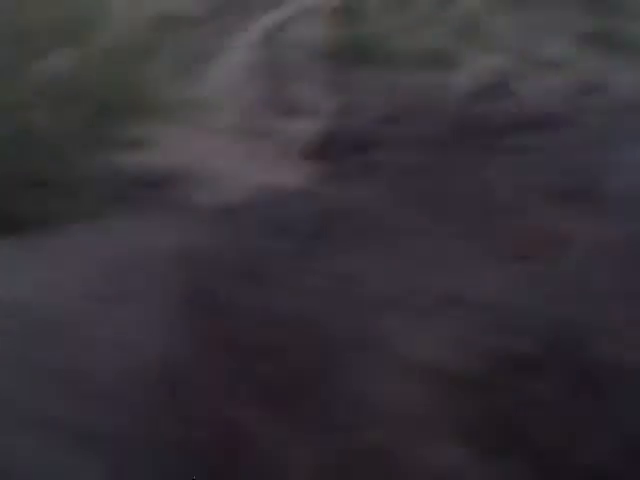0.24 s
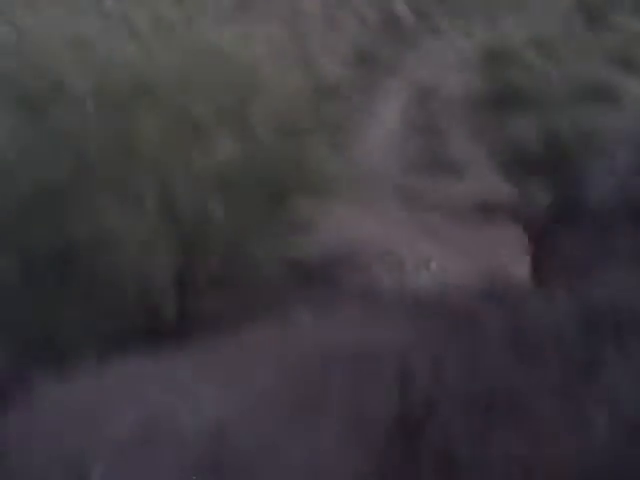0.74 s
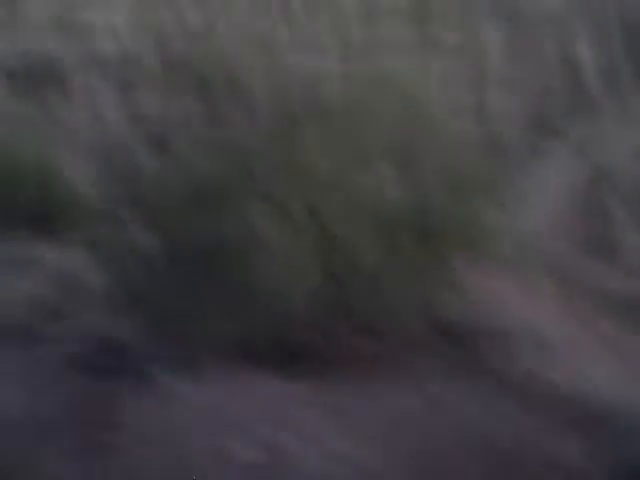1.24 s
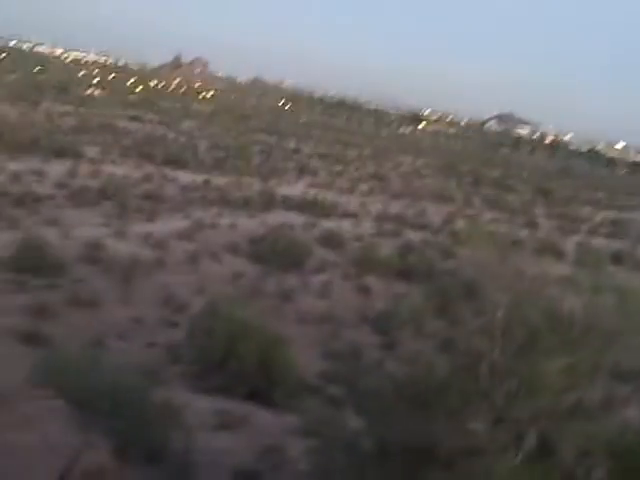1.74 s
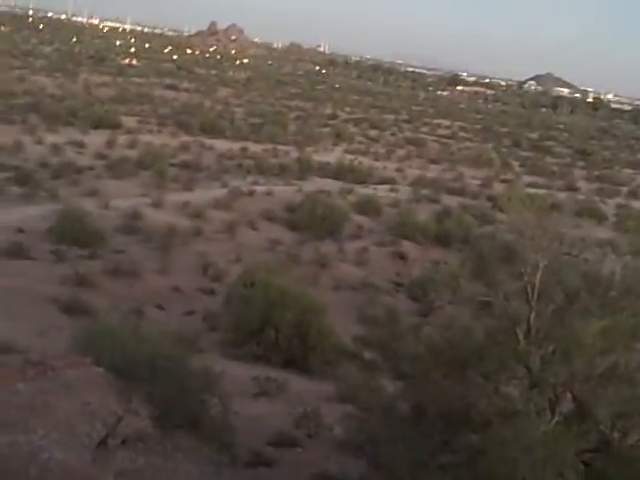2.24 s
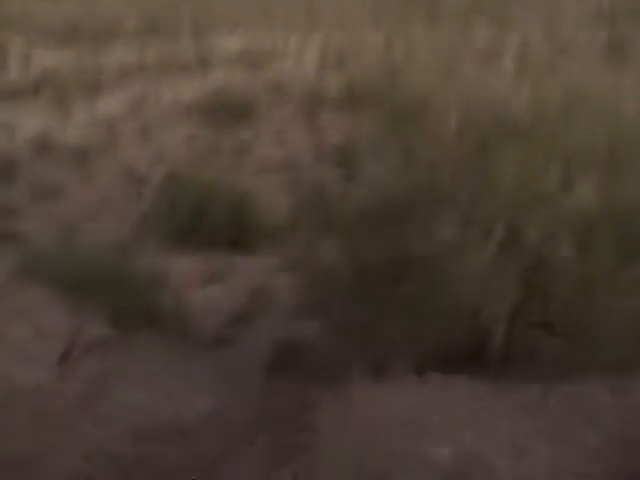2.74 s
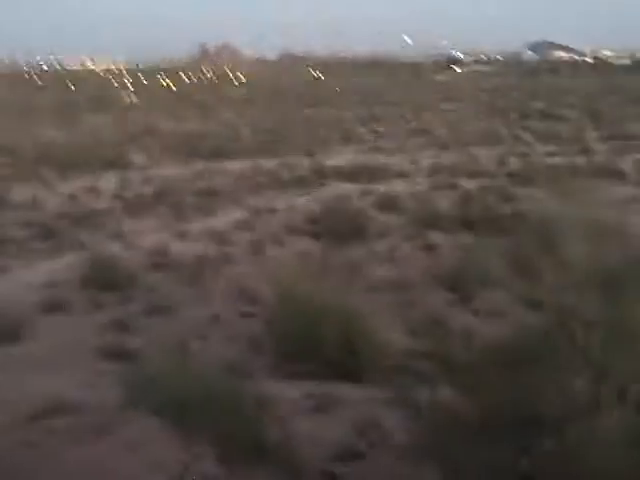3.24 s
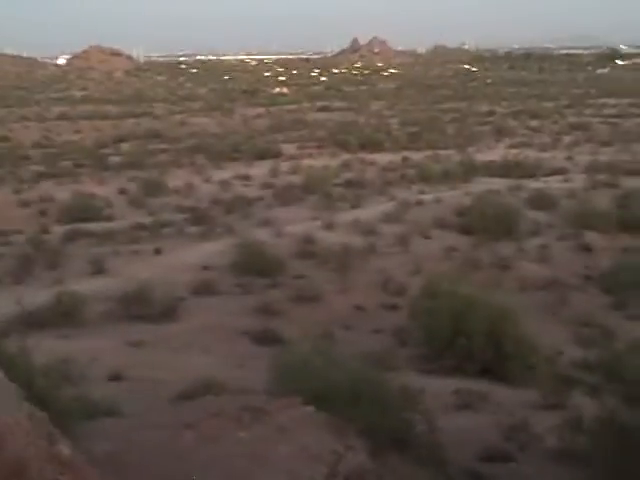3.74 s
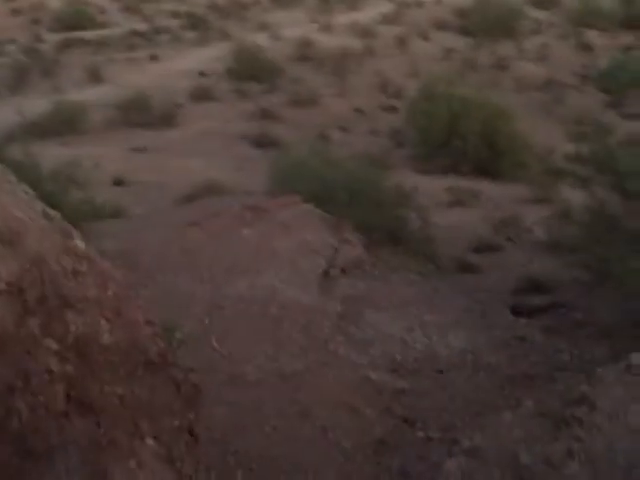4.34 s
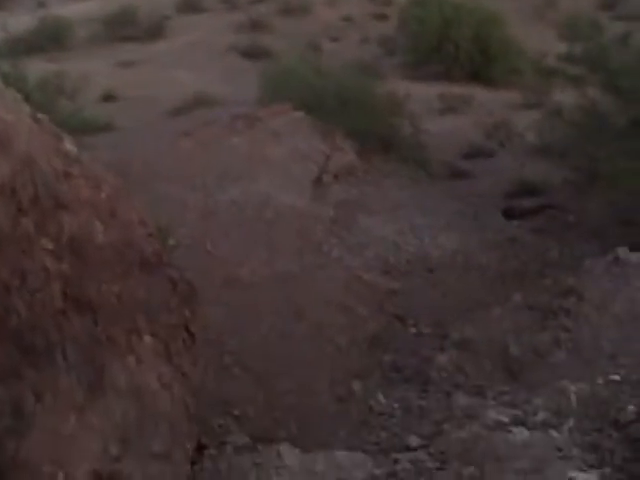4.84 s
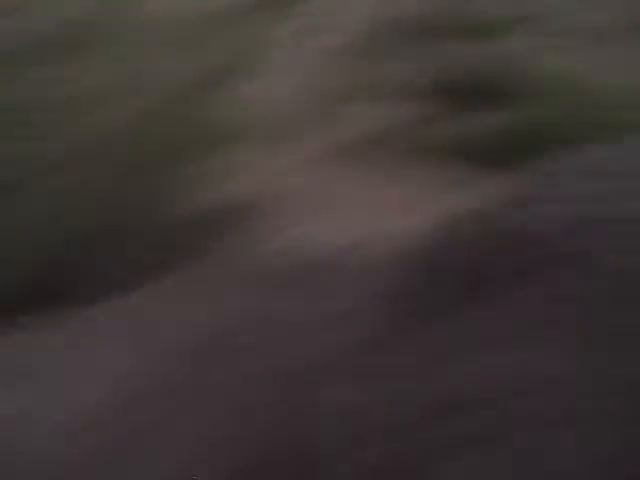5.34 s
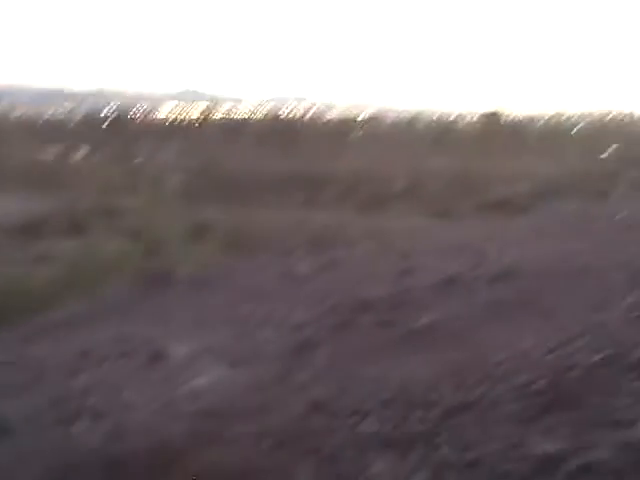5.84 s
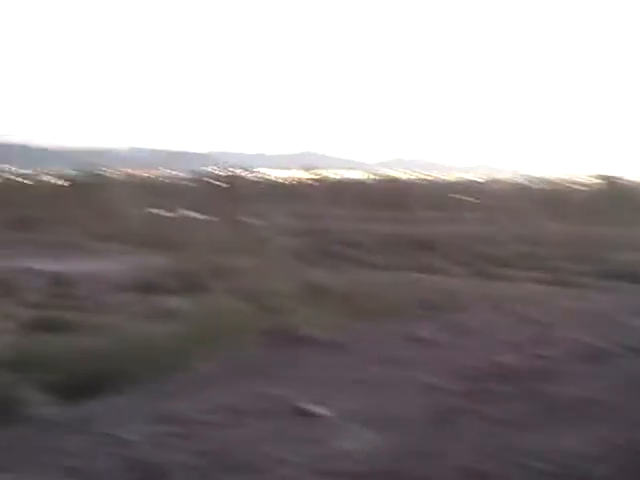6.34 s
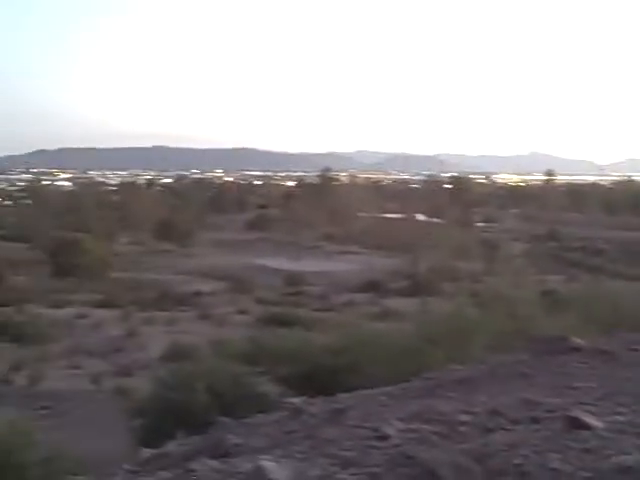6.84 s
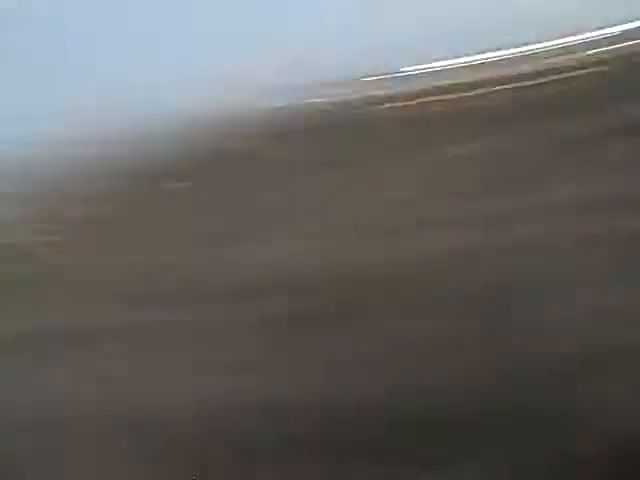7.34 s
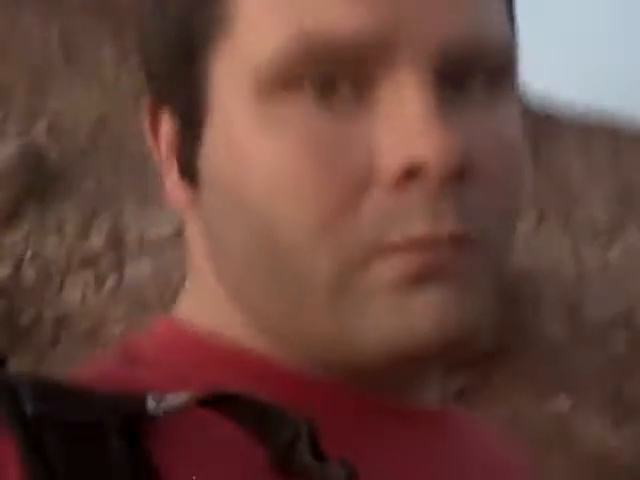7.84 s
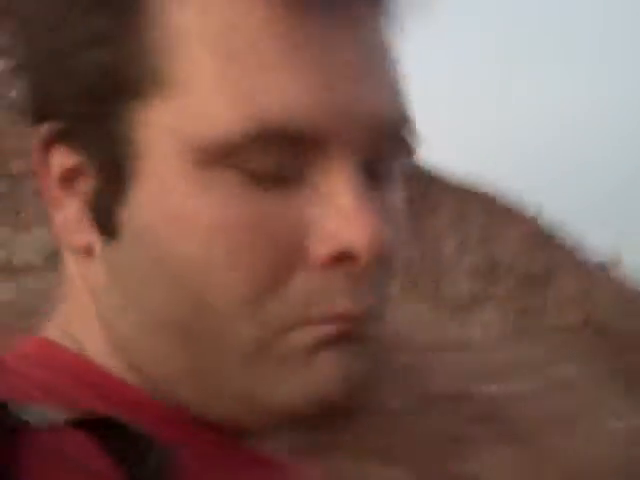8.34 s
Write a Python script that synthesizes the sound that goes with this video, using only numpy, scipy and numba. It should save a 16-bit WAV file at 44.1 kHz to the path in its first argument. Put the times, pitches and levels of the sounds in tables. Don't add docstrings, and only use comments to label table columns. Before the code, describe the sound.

Throughout about 8.6 seconds a nearby cicada buzzes without a break: a dry, piercing sizzle of rapid clicks, about 140 beats a second, brightest around 9 to 10 kHz. From 0 to 0.7 s gravel crunches in quick grains with dull stone knocks; a sharp stone clack comes near 1.05 s and small knocks continue to 1.5 s. Then the walker stands, and the buzz drifts gently in level and tone as the handheld microphone sways, with tight echoes from ground and rock. Faint taps touch the camera at 3.2 and 3.5 s, a clearer double knock at 5.3 s. Around 7.3 to 7.6 s handling taps and a slight shuffle accompany a turn; the buzz drops markedly, then returns partly, quieter and hollow with close echoes. At 8.4 s come small clicks and gravel, then a rapid strap creak at 8.5. Very faint distant traffic rumbles below; coarse digital fizz clings to the buzz.

```python
import sys
import numpy as np
from scipy import signal
from scipy.io import wavfile
from scipy.ndimage import uniform_filter1d, map_coordinates
from numba import njit

SR = 44100
rng = np.random.default_rng(int(sys.argv[2]) if len(sys.argv) > 2 else 0)


def attenuation_scalar(level_db):
    decades = np.asarray(level_db, float) / 20
    return 10 ** decades


def dump_mix(stems):
    frames = np.atleast_2d(stems).T
    limited = np.clip(frames, -1, 1)
    pcm = np.round(limited * 32767).astype(np.int16)
    wavfile.write(sys.argv[1], SR, pcm)


N = 378676

BEATS_PER_S = 142.2
RIB_DRIFT, RIB_DRIFT_DB = .013, 1.5
SOFTEN = 1.5
SCRUB_DB, SCRUB_SHADE_DB = -10.5, 7
ECHO_FADE_S = .08
HAND_MS = .03
TOWN_DB = -50
SNAP_T60 = .011

# (time [s], path from insect to microphone beyond a fixed base [m])
WALK = [(0, 2.81), (.125, 2.71), (.5, 2.2), (.875, 1.57), (1.25, 1.16), (1.5, .99), (2, .9), (2.5, .84),
        (2.875, .95), (3.2, .89), (3.5, .96), (3.875, .95), (4.35, 1.07), (4.85, .93), (5.375, .93),
        (6.08, 1.16), (6.65, .94), (8.59, .97)]
# (delay [ms], level [dB], pitch [Hz], pitch scatter [share], ring [ms], timing scatter [ms])
RIB_CLICKS = [(-.36, -12, 7299, .03, .09, .03), (-.2, -16.5, 13990, .03, .07, .1),
              (-.06, -1.79, 9797, .033, .135, .04), (.9, -22, 6588, .05, .16, .2),
              (1.35, -13, 11990, .015, .24, .07), (1.9, -12, 9496, .04, .1, .06),
              (2.2, -16, 12000, .015, .24, .08), (2.9, -15, 7283, .05, .11, .1),
              (3.1, -16, 10810, .05, .12, .2), (3.7, -18, 10470, .06, .1, .25),
              (4.3, -21, 6990, .07, .14, .25), (4.9, -18, 11800, .04, .14, .3),
              (5.6, -20, 10030, .06, .1, .3)]
# (frequency [Hz], level [dB per Hz])
AIR_SAC = [(5000, -50), (6000, -38), (6200, -19), (6350, -15), (6700, -17), (7400, -12.5), (8500, -7),
           (9400, -0.5), (10000, 0), (11250, -8), (12000, -5), (13000, -12), (15000, -20), (15700, -24)]
# (time [s], level [dB], off-axis blur of the peak [dB], aim toward the treble [dB])
CAMERA_AIM = [(0, -30, 0, 0.78), (.48, -32.5, 2, 1), (1.28, -29.5, 0.14, 0.11), (1.6, -31, -0.4, 0.35),
              (2.75, -30, -1.3, 0.24), (3.2, -30.5, -.5, -.5), (3.4, -32.5, 0.67, -.5),
              (4.05, -33, 2.5, -0.32), (4.6, -31, -0.84, -0.94), (5, -32.5, 1.4, -1.25),
              (5.3, -30, -0.97, -0.65), (5.6, -31, -0.14, 0.3), (5.85, -34, -0.23, -0.33),
              (6.4, -34, -1.03, 0.25), (7.42, -31, -0.82, 1.86), (7.68, -41, 1.76, -0.4),
              (8.16, -37.5, -1.25, -0.25), (8.59, -38.5, 0.2, -0.7)]
# (low edge [Hz], high edge [Hz])
BUZZ_BANDS = [
    (8500, 11000),
    (6000, 8500),
    (11000, 13000),
    (13000, 15700),
]
# (level against the peak [dB], share of blur [ratio], share of aim [ratio])
BESIDE_PEAK = [
    (-10, 1.05, -1.05),
    (-5.5, .95, .95),
    (-13.5, 1.05, 1.05),
]
# (start [s], end [s])
TURNED_BACK = (7.45, 7.66)
# (start [s], end [s], first delay [ms], last delay [ms], level [dB])
SINGLE_ECHOES = [(-.1, .95, .72, .76, -11), (1.05, 3.15, .8, .83, -11), (0, 1.5, 1.25, 1.3, -15),
                 (1.15, 2.1, 1.72, 1.68, -14), (1.2, 1.95, 3.35, 3.1, -15), (1.85, 2.9, 3.02, 3.0, -11),
                 (2.85, 3.4, 3.0, 3.5, -11), (3.4, 3.8, 2.6, 2.5, -12), (3.8, 5.15, 2.98, 2.76, -11),
                 (3.7, 5.2, 1.3, 1.25, -15), (3.9, 4.7, 1.95, 1.75, -14), (4.2, 5.2, 2.4, 2.2, -14),
                 (5.2, 6.2, .95, .88, -12), (5.6, 6.95, 1.6, 1.5, -13), (5.7, 7.55, 3.3, 3.5, -14),
                 (6.85, 7.55, 1.87, 1.84, -9), (7.3, 8.05, .95, .75, -9), (7.9, 8.65, .98, .92, -3),
                 (7.8, 8.2, 2.2, 2.1, -7), (8.35, 8.7, 1.95, 2.0, -5), (7.9, 8.6, 3.1, 3.2, -11),
                 (7.95, 8.3, 4, 3.9, -10)]
# (frequency [Hz], level [dB per Hz])
TOWN_COLOUR = [(12, -25), (22, -4.5), (50, 0.5), (65, -3.5), (100, -2.5), (200, -8), (310, -16), (420, -17),
               (600, -21), (1000, -27), (2000, -40)]
# (time [s], length [s], thud level [dB], grind level [dB], grit level [dB])
GRAVEL_STROKES = [(0.082, 0.043, -44, -44.5, -47), (0.121, 0.046, -48, -32.5, -41),
                  (0.175, 0.037, -50.5, -37, -44.5), (0.2, 0.018, -52, -44, -50.5),
                  (0.212, 0.026, -42.5, -37, -44.5), (0.234, .04, -54, -48, -55),
                  (0.291, .06, -56, -51, -58), (0.454, .03, -60, -48.5, -55.5),
                  (0.53, 0.037, -49, -52, -60), (.567, .022, -46, -43, -51),
                  (.595, 0.043, -52.5, -49, -57.5), (.641, .033, -50, -45, -47),
                  (0.672, 0.033, -58, -52, -58), (1.081, .1, -53.5, -49.5, -58),
                  (1.438, 0.039, -54, -51, -58), (7.4, 0.11, -54.5, -55, -62.5),
                  (7.667, 0.061, -60, -56.5, -66.5), (8.351, 0.067, -63, -60.5, -62.5),
                  (8.42, 0.047, -52, -52.5, -57.5), (8.524, 0.08, -56.5, -52, -63.5)]
# (time [s], peak level [dB], pitch [Hz], time to fall 60 dB [s])
STONE_KNOCKS = [(.127, -25, 905, .012), (.143, -24, 1900, 0.012), (.188, -27, 1249, .016),
                (0.22, -25, 800, .012), (.229, -29, 1400, .012), (0.356, -28, 899.5, .008),
                (.412, -39, 829.8, .012), (.534, -37.5, 419, .015), (.573, -29, 709.2, .014),
                (.646, -34, 2510, 0.019), (.862, -28.5, 1253, 0.028), (.869, -32, 1050, .035),
                (1.0548, -17.5, 919, 0.013), (1.267, -38, 501, .012), (1.358, -39, 800, 0.0096),
                (1.375, -29, 449.4, .016), (1.465, -37, 671, .014)]
# (time [s], peak level [dB], pitch [Hz], time to fall 60 dB [s])
SHELL_KNOCKS = [(3.172, -39.5, 560.5, .012), (3.5355, -30.5, 800, .01), (5.332, -23.5, 948, .018),
                (5.3397, -29.5, 1143, .011), (5.41, -37.5, 389.7, .014), (7.279, -41.5, 810, .012),
                (7.427, -37, 562, .012), (7.468, -36.5, 970, .014), (7.4929, -26, 1050, .013),
                (7.494, -31, 1500, .014), (7.538, -44, 660, .012), (7.566, -32, 1900, .005),
                (7.799, -33.5, 2400, .004), (8.423, -43, 901, .008), (8.4343, -31, 4980, .004),
                (8.434, -34.5, 1990, .007), (8.445, -36, 2104, .006)]
# (time [s], peak level [dB])
STRAP_SLIPS = [(8.511, -38.5), (8.5242, -36), (8.533, -38), (8.5395, -35), (8.546, -35.5), (8.553, -34),
               (8.5617, -40.5), (8.570, -36.5), (8.578, -35.5)]
# (pitch [Hz], level [dB], time to fall 60 dB [s])
STRAP_TONES = [(800, -2.5, .025), (1400, 3.5, 0.016), (1556, -3.5, 0.011), (1910, -4.5, 0.012),
               (2420, -3.5, .014), (3230, -7, 0.013)]


def evened(x):
    return x / np.sqrt(np.mean(x ** 2) + 1e-20)


def wander(count, size):
    once = uniform_filter1d(rng.standard_normal(count), size)
    return evened(uniform_filter1d(once, size))


def read(points, hz):
    f, value = np.transpose(points)
    return np.interp(np.log(hz + 1), np.log(f + 1), value)


def band(x, lo_hz, hi_hz):
    return signal.sosfilt(signal.butter(2, [lo_hz, hi_hz], "band", fs=SR, output="sos"), x)


def add(mix, s, sound):
    part = mix[round(s * SR):][:len(sound)]
    part += sound[:len(part)]


def drum():
    beats = np.arange(-3, N / SR * BEATS_PER_S) / BEATS_PER_S
    s, metres = np.transpose(WALK)
    beats = beats + np.interp(beats, s, metres) / 343
    count = len(beats)
    beats = beats + .08e-3 * rng.standard_normal(count)
    effort_db = .5 * rng.standard_normal(count)[:, None]
    stumble_db = -7 * (rng.random(count) < .05)[:, None]
    out = np.zeros(N + 2 * SR)
    k = np.arange(64)
    for ms, db, hz, scatter, ring_ms, jitter_ms in RIB_CLICKS:
        late, detune, strength, phase = rng.standard_normal((count, 4)).T[:, :, None]
        hz = hz * (1 + RIB_DRIFT * wander(count, size=30)[:, None])
        hz = hz * (1 + scatter * detune)
        db = db + RIB_DRIFT_DB * wander(count, size=20)[:, None]
        db = db + effort_db + stumble_db * (ms < .1) + .9 * strength
        ring_ms = SOFTEN * ring_ms
        at = (beats[:, None] + (ms - ring_ms + jitter_ms * late) / 1000 + 1) * SR
        t = (k - at % 1).clip(0) / SR
        u = t * 1000 / ring_ms
        swell = (u * np.exp(1 - u)) ** 2
        ring = swell * np.cos(2 * np.pi * hz * t + 4 * phase)
        np.add.at(out, at.astype(int) + k, attenuation_scalar(db) * ring)
    return out[SR:SR + N]


def surroundings(x):
    t, out = np.arange(N) / SR, x.copy()
    smooth = signal.cspline1d(x)
    for start, end, ms, later_ms, db in SINGLE_ECHOES:
        on = (t > start) & (t < end)
        u = t[on]
        fade = np.minimum(np.minimum(u - start, end - u) / ECHO_FADE_S, 1)
        late = u - np.interp(u, [start, end], [ms, later_ms]) / 1000
        sway = np.interp(u, np.arange(1000) / 100, wander(count=1000, size=25))
        late -= HAND_MS / 1000 * sway
        out[on] += attenuation_scalar(db) * fade * map_coordinates(smooth, [late * SR], order=3, prefilter=False)
    lag = np.arange(3000) / SR
    scrub = attenuation_scalar(SCRUB_DB + SCRUB_SHADE_DB * np.interp(t, TURNED_BACK, [0, 1]))
    for k in range(3):
        twigs = rng.standard_normal(3000) * (rng.random(3000) < .3)
        twigs = twigs * attenuation_scalar(-60 * lag / .045) * (lag > .0005)
        turn = np.sqrt(2 / 3) * np.cos(2 * np.pi * (.35 * t + k / 3))
        out += scrub * signal.oaconvolve(x * turn, twigs / np.linalg.norm(twigs))[:N]
    return out


def cicada():
    hz, t, z = signal.stft(surroundings(drum()), SR, nperseg=512, noverlap=384)
    own_colour = np.sqrt(uniform_filter1d((abs(z) ** 2).mean(1), 9) + 1e-14)
    z = z * (attenuation_scalar(read(AIR_SAC, hz)) / own_colour)[:, None]
    s, peak_db, blur_db, aim_db = np.transpose(CAMERA_AIM)
    beside_db = [db + blur * blur_db + aim * aim_db for db, blur, aim in BESIDE_PEAK]
    wanted_db = np.array([np.interp(t, s, peak_db + f) for f in [0, *beside_db]])
    inside = np.array([(hz >= lo) & (hz < hi) for lo, hi in BUZZ_BANDS]) * 1.
    power = uniform_filter1d(inside @ abs(z) ** 2 * 4 / 3, 40, axis=1)
    blend = uniform_filter1d(inside, 15, axis=1) + 1e-6
    gain_db = (blend / blend.sum(0)).T @ (wanted_db - 10 * np.log10(power))
    return signal.istft(z * attenuation_scalar(gain_db), SR, nperseg=512, noverlap=384)[1][:N]


def town():
    frames, hz = N // 512 + 5, np.fft.rfftfreq(2048, 1 / SR)
    a, b, patches = rng.standard_normal((frames, 1025, 3)).T
    patches = uniform_filter1d(patches, 6, 0)
    patches = evened(uniform_filter1d(patches, 8, 1))
    z = (a + 1j * b) * attenuation_scalar(read(TOWN_COLOUR, hz)[:, None] + 1.2 * patches)
    rumble = signal.istft(z, nperseg=2048, noverlap=1536)[1][:N]
    return attenuation_scalar(TOWN_DB) * evened(rumble)


def crunch(s, length, thud_db, grind_db, grit_db):
    count = round(length * SR)
    size = rng.exponential(1, 6000).clip(0, 4)
    chance, side = rng.random((6000, 2)).T
    struck = chance < 5000 / SR
    grains = (attenuation_scalar(3.5 * size) * struck * np.sign(side - .5))[:count]
    layers = ((thud_db + 2, 150, 750), (grind_db, 500, 2300), (grit_db + 2, 2000, 6500))
    sound = sum(attenuation_scalar(db) * evened(band(grains, lo_hz, hi_hz)) for db, lo_hz, hi_hz in layers)
    return s, sound * signal.windows.tukey(count, .35)


def knock(s, db, hz, t60):
    t = np.arange(2000) / SR
    push = .33 * np.sin(2 * np.pi * .45 * hz * t)
    ring = (np.sin(2 * np.pi * hz * t) + push) * attenuation_scalar(-60 * t / t60)
    snap = .6 * np.sin(2 * np.pi * 1.6 * hz * t) + .45 * np.sin(2 * np.pi * 2.3 * hz * t)
    scrape = .35 * evened(band(rng.standard_normal(len(t)), .6 * hz, 3.2 * hz))
    bright = (snap + scrape) * attenuation_scalar(-60 * t / min(SNAP_T60, t60))
    soft_start = np.minimum(t / .0004, 1)
    return s, attenuation_scalar(db - 2.5) * (ring + bright) * soft_start


def slip(s, db):
    t = np.arange(1500) / SR
    ring = sum(attenuation_scalar(d - 60 * t / t60) * np.sin(2 * np.pi * hz * t) for hz, d, t60 in STRAP_TONES)
    return s, attenuation_scalar(db - 7.5) * ring


def scene():
    mix = cicada() + town()
    noises = ((crunch, GRAVEL_STROKES), (knock, STONE_KNOCKS), (knock, SHELL_KNOCKS), (slip, STRAP_SLIPS))
    for maker, table in noises:
        for row in table:
            add(mix, *maker(*row))
    return mix[None]


@njit
def store_in_steps(x, levels, growth):
    out, held, step = np.empty_like(x), 0., 1e-3
    half = levels // 2
    for i in range(len(x)):
        change = x[i] - held
        code = min(int(abs(change) / step * levels / 2), levels - 1)
        held += np.sign(change) * (code + .5) * step * 2 / levels
        out[i] = held
        power = -1 if code < half else 2 * (code - half + 1)
        step = max(step * growth ** power, 2e-4)
    return out


def band_limit(x):
    return signal.sosfilt(signal.butter(12, 15750, fs=SR, output="sos"), x)


def record(dry):
    stored = store_in_steps(dry[0], 8, 1.1)[None]
    return band_limit(stored)


dry = scene()
out = record(dry)
dump_mix(out)
```